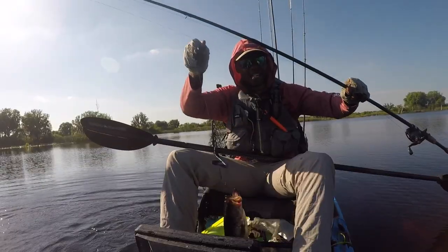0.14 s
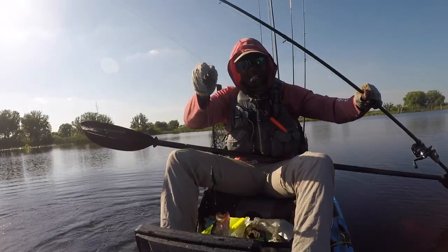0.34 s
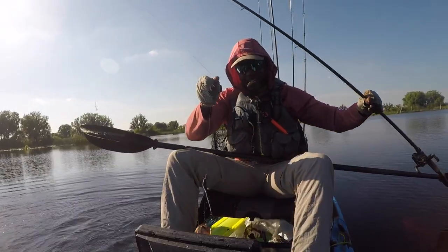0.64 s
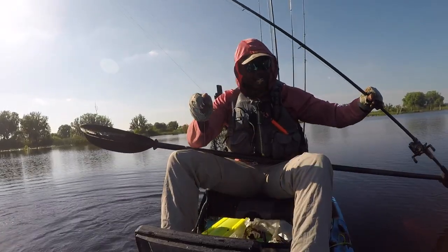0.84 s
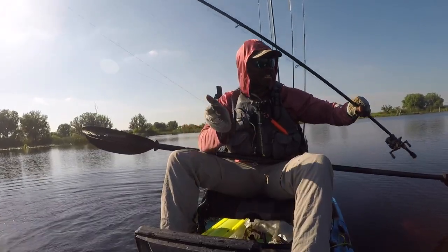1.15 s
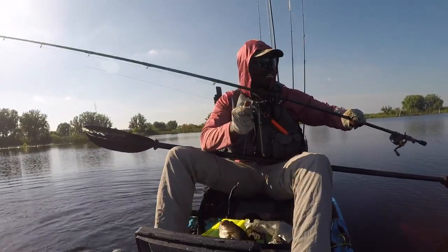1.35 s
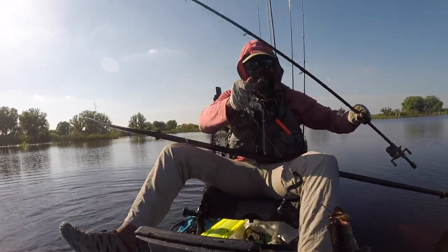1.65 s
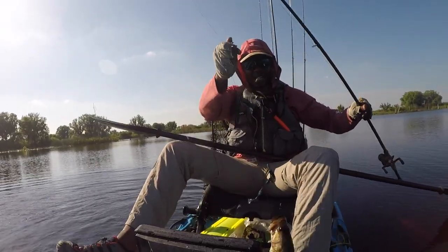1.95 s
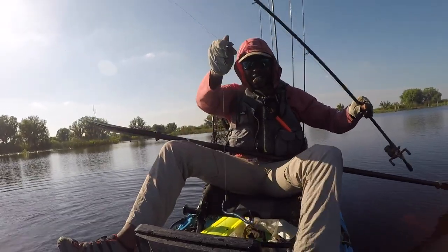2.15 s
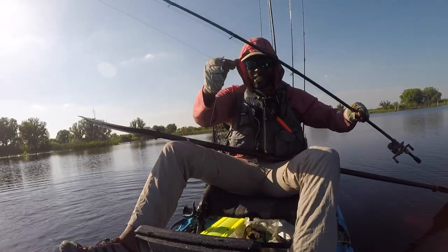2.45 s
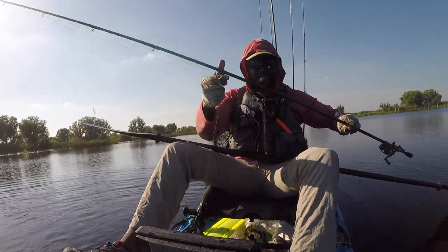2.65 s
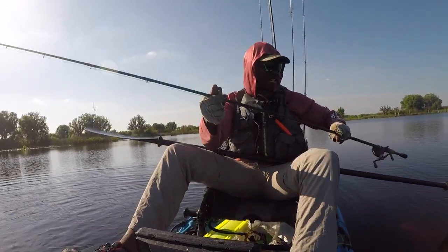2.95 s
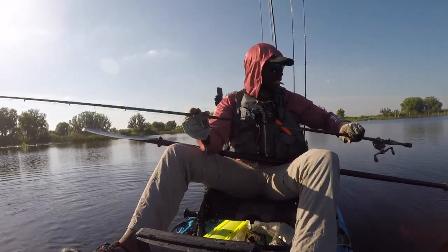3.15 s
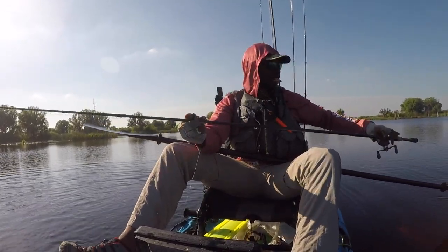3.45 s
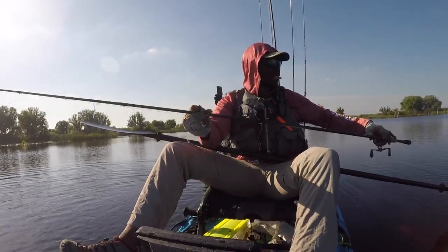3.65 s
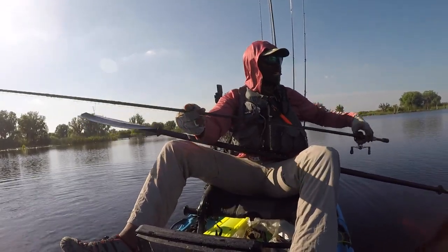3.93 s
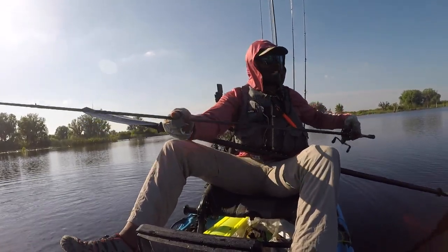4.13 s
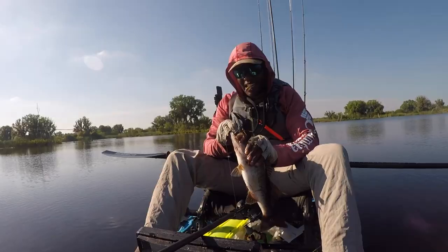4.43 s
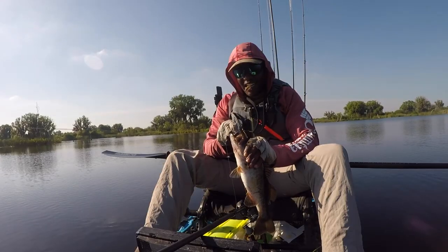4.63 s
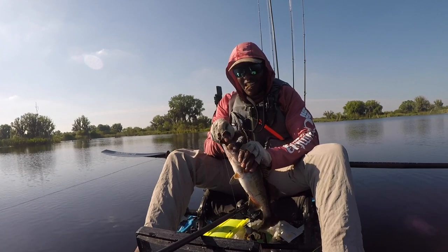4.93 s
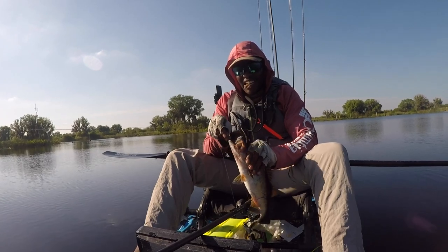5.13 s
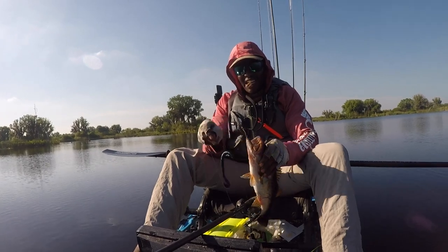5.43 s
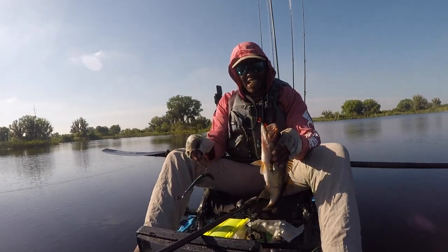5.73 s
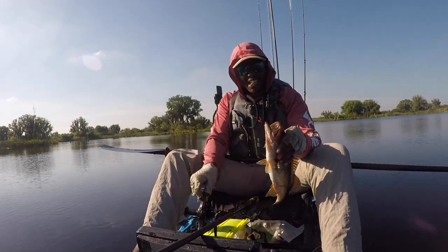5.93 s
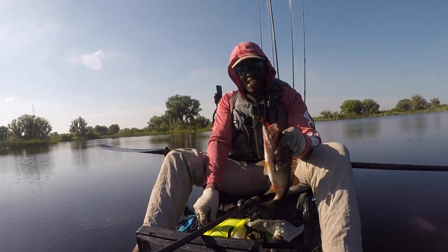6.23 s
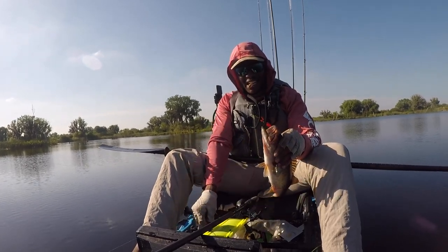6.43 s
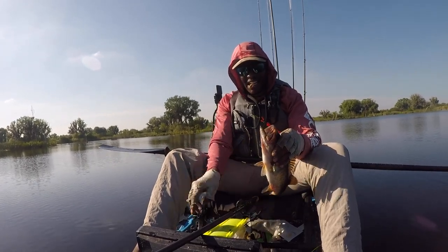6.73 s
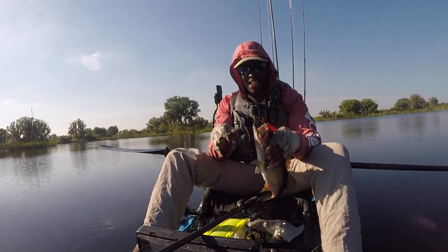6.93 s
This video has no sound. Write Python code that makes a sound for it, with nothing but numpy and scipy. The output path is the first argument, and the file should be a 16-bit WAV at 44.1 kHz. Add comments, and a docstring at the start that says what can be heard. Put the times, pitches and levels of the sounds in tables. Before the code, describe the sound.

Heavy wet flops boom through a plastic boat hull with cracking tail smacks and spray, before a sudden cut to soft waves and small clicks.

```python
"""Calm lake, plastic kayak: a large fish thrashes in the footwell. Its body drums resonant hull noise and sagging
tones; its wet tail cracks and sprays in bursts of noise, with short ringing pops of trapped air.
A marsh bird buzzes a short trill of pulsed tones. A cut at 4.4 s ends the thrashing; the next scene has tackle
clicks (noise, pings, lid tones) over small waves. Drips are gliding tones; lapping and hiss are shaped noise.
Two ports on the boat hear it all."""
import sys
import numpy as np
from scipy import signal
from scipy.fft import rfft, irfft, next_fast_len
from scipy.io import wavfile
from scipy.ndimage import uniform_filter1d, map_coordinates

SR = 44100
rng = np.random.default_rng(int(sys.argv[2]) if len(sys.argv) > 2 else 0)


def elevation(decibels):
    """Turn decibel levels (scalar or array-like) into linear amplitude ratios."""
    levels = np.asarray(decibels, float)
    return 10 ** (levels / 20)


def store_pcm(level_fs):
    """Save levels as 16-bit WAV."""
    pcm = np.round(np.clip(level_fs, -1, 1) * 32767).astype(np.int16)
    wavfile.write(sys.argv[1], SR, np.atleast_2d(pcm).T)


N = 312228
CUT_S = 4.395  # cut: the scene jumps from the thrashing to small waves and tackle

# hull wall resonances: (centre [Hz], width of one pass [Hz], gain [dB])
HULL_MODES = [(166, 47.7, -4), (210.7, 59, 0), (261.8, 70.3, -1.5), (340, 51.6, -4), (388.2, 49, -7)]
# footwell cavity and deck resonances: (centre [Hz], width of one pass [Hz], gain [dB])
WELL_MODES = [(449.3, 56, 3), (600, 112, 8), (800, 154, 5), (1206, 530, -14)]
# colour of a wet smack: (frequency [Hz], relative gain [dB])
SMACK_COLOUR = [(900, 17), (1500, 8.5), (2700, 4), (4000, 1), (6000, -14.5)]
# colour of spray: (frequency [Hz], relative gain [dB])
SPRAY_COLOUR = [(3000, -4.5), (4800, -3.5), (6400, 2.5), (8000, -7), (9200, -14), (10500, -17),
                (12000, -64), (15000, -62.5)]
# rocking of the boat and place of the fish: (time [s], level [dB], left-right shift before clipping [dB])
BOAT_ROCKING = [(0.0, -58, -11), (0.02, -52.5, 0), (1.09, -67, -1), (1.38, -42, -1.5), (1.48, -43.5, 2.5),
                (1.53, -21.5, -3.5), (1.62, -28, -1), (1.68, -41, 2), (1.79, -21, -2), (1.91, -34, -1.5),
                (2.07, -20.5, -4), (2.13, -44.5, 1), (2.21, -34.5, -1), (2.41, -47, 0.5), (2.57, -33, 0.5),
                (2.84, -37, 1), (2.94, -30.5, -2), (3.06, -25, 1), (3.15, -22, 0.5), (3.46, -27.5, -1),
                (3.52, -22, 0.5), (3.59, -27.5, 3), (3.68, -20, 0), (3.9, -38.5, 2.5), (4.25, -28.5, 5),
                (4.3, -39.5, 7.5), (4.35, -25.5, 3.5), (4.4, -31.5, 7.5)]
# stereo width of the treble: (time [s], side gain [dB])
TREBLE_WIDTH = [(0, 2.5), (2.3, 3.5), (3.6, -3), (3.9, -24.5), (4.38, -37), (4.4, 3), (7.08, 2.5)]


def unit(x):
    """Scale to rms 1."""
    return x / np.sqrt(np.mean(x ** 2) + 1e-20)


def along(points, hz):
    """Interpolate (frequency [Hz], value) points on a log frequency axis."""
    f, v = np.transpose(points)
    return np.interp(np.log(hz + 1), np.log(f + 1), v)


def curves(rows):
    """One value per sample for each column after the time; -120 outside the rows."""
    s, *cols = np.transpose(rows)
    return [np.interp(np.arange(N) / SR, s, c, -120, -120) for c in cols]


def held(times, values, ahead_s=.02):
    """The value of the latest event, taken slightly early, and the seconds from it."""
    t = np.arange(N) / SR + ahead_s
    latest = np.clip(np.searchsorted(times, t) - 1, 0, None)
    return values[latest], np.abs(t - times[latest])


def filtered(x, response):
    """Filter x by a complex response of frequency."""
    m = next_fast_len(N + 8192)
    return irfft(rfft(x, m) * response(np.fft.rfftfreq(m, 1 / SR)), m)[..., :N]


def coloured(x, points):
    """Filter x by a (frequency [Hz], gain [dB]) colour, rms 1."""
    return unit(filtered(x, lambda hz: elevation(along(points, hz))))


def ringing(x, modes):
    """Causal resonances of alternating sign, applied twice for dark valleys, rms 1."""
    def one_pass(f):
        total = 0
        for k, (centre, width_hz, db) in enumerate(modes):
            mode = 1j * f * width_hz / (centre * centre - f * f + 1j * f * width_hz)
            total = total + (-1) ** k * elevation(db / 2) * mode
        return total
    return unit(filtered(x, lambda f: one_pass(f) ** 2))


def lumpy(knots_per_s, depth_db):
    """Two noises sharing a randomly wandering level."""
    knots = rng.standard_normal(int(N * knots_per_s / SR) + 4)
    wander = map_coordinates(knots, [np.arange(N) * knots_per_s / SR])
    return elevation(depth_db * wander) * rng.standard_normal((2, N))


def wavering(hz, width_hz):
    """Two narrow noises riding on a moving pitch, rms 1."""
    slow = filtered(rng.standard_normal((2, 2, N)), lambda f: 1 / (1 + (f / width_hz) ** 2))
    phase = 2 * np.pi * np.cumsum(np.clip(hz, 0, SR / 2)) / SR
    return unit(slow[0] * np.cos(phase) + slow[1] * np.sin(phase))


def decays(times, db, t60_s, rise_s):
    """Envelope: every event rises with time constant rise_s and dies exponentially."""
    env, t = np.zeros(N + SR), np.arange(SR // 3) / SR
    for s, level_db, life_s in zip(times, db, t60_s):
        env[round(s * SR):][:len(t)] += elevation(level_db - 60 * t / life_s) * (1 - np.exp(-t / rise_s))
    return env[:N]


def swells(times, db, rise_s, t60_s):
    """Envelope: every event climbs 60 dB in rise_s and loses them in t60_s; powers add."""
    power = np.zeros(N)
    for s, level_db, up, down in np.broadcast(times, db, np.clip(rise_s, .005, 5), np.clip(t60_s, .01, 5)):
        i, j = max(round((s - up) * SR), 0), min(round((s + down) * SR), N)
        t = np.arange(i, j) / SR - s
        power[i:j] += elevation(2 * (level_db - 60 * np.maximum(t / down, -t / up)))
    return np.sqrt(power)


def wavelets(times, db, hz, swell_s, sags=1):
    """Short tones that swell and die on a sagging pitch; the second wave starts at a chance phase."""
    out, t = np.zeros((2, N + SR)), np.arange(SR // 4) / SR
    start = rng.uniform(0, 2 * np.pi, (len(times), 2, 1)) * [[0], [1]]
    sag_t = t + sags * 0.18 * 0.018 * (1 - np.exp(-t / 0.022))
    for s, level_db, f, rise_s, phase in zip(times, db, hz, np.clip(swell_s, .001, .03), start):
        env = t / rise_s * np.exp(1 - t / rise_s)
        out[:, round(s * SR):][:, :len(t)] += elevation(level_db) * env * np.sin(2 * np.pi * f * sag_t + phase)
    return out[:, :N]


def ports(pair, more_db=0, loose=1):
    """A common wave reaches the two ports with a lead and a tilt; the second wave is the unrelated share."""
    # phase lead between ports, before side weights: (frequency [Hz], left lead [rad])
    lead_rows = [(0, 0.1), (240, -1.5), (520, -3), (1120, -3.6), (1640, -5.2), (4570, -6.4), (7240, -7.4),
                 (9820, -6.8), (15000, -6.4)]
    # level tilt between ports, before side weights: (frequency [Hz], left-right [dB])
    tilt_rows = [(60, -3.5), (120, -10), (240, -10.5), (470, -10), (940, -1.5), (1880, -4.5), (3740, -3),
                 (7450, -5.5), (14800, -4)]
    # unrelated sound at the ports, before the loose factor: (frequency [Hz], share [0-1])
    loose_rows = [(30, 0.28), (120, 0.32), (250, 0.53), (600, 0.088), (1200, 0.36), (3000, 0.31),
                  (8000, 0.65), (14000, 0.76)]

    def side(sign):
        def response(hz):
            share = np.clip(loose * along(loose_rows, hz), 0, 1)
            gain = elevation(sign * (along(tilt_rows, hz) + more_db) / 2)
            turn = np.exp(.5j * sign * np.interp(hz, *np.transpose(lead_rows)))
            return gain * turn * [np.sqrt(1 - share / 2), sign * np.sqrt(share / 2)]
        return filtered(pair, response).sum(0)
    return np.array([side(0.86), side(-1.085)])


def spread(pair, side_db):
    """Widen or narrow a stereo pair by the gain of its side signal."""
    mid, side = (pair[0] + pair[1]) / 2, (pair[0] - pair[1]) / 2 * elevation(side_db)
    return np.array([mid + side, mid - side])


def low_cut(x, hz):
    """Steep high-pass: the wind filter of the microphone."""
    return filtered(x, lambda f: 1 / np.sqrt(1 + (hz / (f + 1)) ** 40))


def thrashing():
    """Each flop drums the hull, sounds its lowest note, which sags, and sloshes water; the boat rocks; drops fly."""
    # body flops on the hull: (time [s], relative drumming level [dB], relative note level [dB],
    # starting note [Hz], drumming t60 [s])
    flop_rows = [(.02, -30.5, -37, 194, 0.63), (.34, -31.5, -40, 184.7, 0.42),
                 (.71, -38.5, -56.5, 207, 0.71), (1.01, -58, -46, 175.1, 1.12),
                 (1.12, -30.5, -44, 189, 1.5), (1.18, -25, -40.5, 201.6, 1.2),
                 (1.235, -22.5, -38.5, 207, 0.47), (1.275, -11, -28, 206, 0.34),
                 (1.31, -8, -13, 185.1, 0.3), (1.495, -19, -27, 152.2, 0.55),
                 (1.53, -16, -19.5, 160.3, 0.42), (1.63, -13.5, -17, 182.8, 0.12),
                 (1.66, -22, -26, 190.1, .4), (1.71, -22.5, -34, 155.8, .8), (1.78, -19.5, -28.5, 158.7, 1),
                 (1.83, -20, -20, 174.9, 0.23), (1.915, -24, -37.5, 165.6, 0.94),
                 (1.98, -21.5, -21, 140.1, 0.54), (2.04, -16.5, -17.5, 189.1, 0.1),
                 (2.17, -25, -22, 129.9, 0.14), (2.245, -31.5, -37, 123.3, 0.33),
                 (2.413, -23.5, -37, 201.8, 0.22), (2.55, -17.5, -28, 141.5, 0.27),
                 (2.6, -41.5, -20.5, 130.1, 0.45), (2.845, -33.5, -29.5, 169, 0.75),
                 (2.87, -26, -27, 167, 0.68), (2.941, -13, -20, 160.6, 0.46), (3.02, -18, -21, 173.6, 0.18),
                 (3.11, -14.5, -14, 132, 0.34), (3.18, -28.5, -18.5, 109.4, 0.27),
                 (3.372, -13, -14.5, 145, 0.6), (3.421, -13, -17, 158.9, 0.59),
                 (3.48, -14, -21, 149.6, 0.28), (3.54, -14.5, -32, 128, 0.18), (3.596, -42, -21, 123.2, .3),
                 (3.67, -16.5, -35.5, 111.7, 0.2), (3.71, -40, -17.5, 109.1, 0.16),
                 (3.845, -35, -43, 110, 1.2), (3.927, -28.5, -34.5, 123, 0.32),
                 (4.081, -16, -30.5, 188.3, 0.25), (4.11, -30, -19, 144.8, 0.26),
                 (4.176, -26, -28.5, 113.1, 0.25), (4.328, -26.5, -27.5, 108.5, 0.42),
                 (4.35, -21.5, -22.5, 109.9, 0.19)]
    # water flung off the fish: (time [s], relative fizz level [dB], relative spatter level [dB],
    # 60 dB rise before clipping [s], t60 [s])
    splash_rows = [(1.059, -58, -36.5, 0, 0.17), (1.215, -47, -52.5, 0.4, .08),
                   (1.263, -28, -35.5, 0.05, 0.05), (1.282, -28.5, -29.5, 0.1, 0.042),
                   (1.33, -53.5, -34.5, 0.8, 0.17), (1.44, -51, -58, 0.3, 0.2),
                   (1.5, -45, -46.5, 0.4, 0.15), (1.53, -46.5, -40, 0.2, 0.15),
                   (1.634, -44.5, -38, 0.2, .03), (1.77, -49, -53, 0.3, .1),
                   (1.805, -40, -53.5, 0.12, 0.12), (1.838, -44, -52, .1, .06),
                   (1.9, -48.5, -53.5, -2.5, 0.18), (1.95, -46, -48, -0.5, 0.14),
                   (1.99, -42, -50, 0.5, 0.21), (2.03, -52.5, -55, 4, 0.028),
                   (2.178, -38, -39.5, 0.06, 0.033), (2.25, -51, -44, 0.17, 0.092),
                   (2.94, -53.5, -50, 0, .15), (3.01, -37.5, -42, 0.1, .12), (3.121, -22, -27, 0.07, 0.02),
                   (3.14, -57, -62, .005, 1), (3.364, -16, -27, -0.02, 0.022),
                   (3.425, -30.5, -41.5, -0.4, 0.033), (3.47, -43.5, -45, 2, 0.03),
                   (3.54, -56, -47, .005, .18), (3.67, -41.5, -46.5, 0.1, 0.12),
                   (3.94, -57, -44.5, -0.5, .25), (4.08, -53, -36, .03, 0.17), (4.11, -62, -46, .1, .5),
                   (4.19, -62, -47, .05, .25), (4.339, -42, -36, .005, 0.046), (4.38, -57, -24, 0, 0.044)]
    # colour of the rocking: (frequency [Hz], relative gain [dB])
    rock_colour = [(12, -20.5), (30, 19), (40, 26), (55, 16), (85, 21), (120, -57.5)]
    rise_s, note_sag_share, sag_s = 0.05, .15, .08
    s, drum_db, note_db, hz, t60_s = np.transpose(flop_rows)
    start_hz, since_s = held(s, hz)
    note_hz = uniform_filter1d(start_hz * (1 - note_sag_share * (1 - np.exp(-since_s / sag_s))), size=400)
    rock = elevation(curves(BOAT_ROCKING)[0]) * coloured(lumpy(6.4, 1.5), rock_colour)
    # the note outlives the drumming; the slosh dies sooner
    note = swells(s, note_db - 2.5, rise_s, 1.55 * t60_s) * wavering(note_hz, width_hz=32.8)
    drum = swells(s, drum_db - 6, rise_s, t60_s) * ringing(lumpy(30, 2), HULL_MODES)
    slosh = swells(s, drum_db - 14, rise_s, 0.89 * t60_s) * ringing(lumpy(60, 3.5), WELL_MODES)
    s, fizz_db, spatter_db, splash_rise_s, t60_s = np.transpose(splash_rows)
    fizz = swells(s, fizz_db - 4.0, splash_rise_s, t60_s) * coloured(lumpy(300, 3.2), SPRAY_COLOUR)
    spatter = swells(s, spatter_db - 8.0, splash_rise_s, t60_s) * coloured(lumpy(350, 3.2), SMACK_COLOUR)
    return rock + note + drum + slosh + fizz + spatter


def blows():
    """Blows dent the wall, which booms; slaps rattle the footwell and knock its cavity."""
    # slaps in the footwell: (time [s], relative level [dB], settled cavity pitch [Hz])
    slap_rows = [(.158, -39, 600), (.343, -35.5, 610), (1.114, -41.5, 593), (1.178, -27, 625),
                 (1.267, -13.5, 465), (1.293, -12, 412), (1.331, -11.5, 577), (1.358, -18.5, 453),
                 (1.493, -19, 710), (1.526, -31, 580), (1.604, -28, 607), (1.629, -22, 800),
                 (1.641, -26, 760), (1.701, -23, 468), (1.736, -34.5, 570), (1.771, -26, 485),
                 (1.797, -23, 800), (1.818, -21.5, 481), (1.838, -15.5, 556), (1.8386, -24, 846),
                 (1.855, -28.5, 620), (1.932, -29, 587), (1.962, -27, 503), (1.995, -25, 455),
                 (2.035, -22.5, 488), (2.157, -29.5, 616.8), (2.19, -28.5, 553), (2.407, -22, 750),
                 (2.41, -20, 480), (2.541, -28, 496), (2.853, -38.5, 510), (2.881, -31, 574),
                 (2.936, -16.5, 514), (2.972, -24, 645), (3.01, -23, 502), (3.108, -9.5, 598),
                 (3.197, -27, 600), (3.366, -5.5, 634), (3.404, -16, 522), (3.474, -12, 655),
                 (3.535, -16.5, 570), (3.652, -30.5, 715), (3.668, -14.5, 574), (3.845, -46, 487.1),
                 (3.927, -18, 556), (4.074, -11.5, 796), (4.095, -25.5, 560), (4.168, -25, 490),
                 (4.186, -26, 620), (4.324, -21.5, 476), (4.345, -16.5, 830)]
    # booms of the hull wall: (time [s], relative level [dB], settled pitch [Hz])
    boom_rows = [(0.028, -24.5, 255), (0.121, -35, 193), (.156, -29.5, 340), (0.304, -37, 171),
                 (0.344, -29, 154), (.461, -48.5, 171), (.545, -42.5, 178), (0.708, -36, 241),
                 (0.738, -24.5, 200), (0.861, -35, 220), (1.025, -35, 187), (1.117, -30.5, 186),
                 (1.176, -25, 247), (1.286, -11, 316), (1.291, -14, 279), (1.314, -11.5, 185),
                 (1.444, -31, 126.6), (1.492, -15, 345), (1.525, -8, 168), (1.56, -16.5, 170),
                 (1.626, -6.5, 187), (1.706, -14, 171), (1.776, -12, 243), (1.802, -14, 191),
                 (1.82, -13, 169.5), (1.838, -9.5, 209), (1.913, -23, 223), (1.979, -21, 131.5),
                 (2.034, -6.5, 192), (2.101, -25, 113), (2.168, -20.5, 126.7), (2.196, -17, 91),
                 (2.228, -23.5, 94.4), (2.251, -20.5, 133), (2.407, -27.5, 365), (2.54, -21.5, 386),
                 (2.544, -6, 128), (2.545, -9.5, 223.5), (2.566, -4.5, 120), (2.586, -13.5, 116.5),
                 (2.603, -10, 116), (2.62, -12.5, 117), (2.636, -10.5, 112.6), (2.862, -18, 198.6),
                 (2.937, -9.5, 158), (3.014, -14.5, 196), (3.024, -9, 225), (3.102, -10, 108.3),
                 (3.372, -10.5, 190), (3.413, -15, 175.5), (3.442, -8, 149.4), (3.471, -7.5, 193),
                 (3.5, -12, 140), (3.555, -12, 112), (3.578, -12.5, 109.4), (3.645, -14.5, 111),
                 (3.79, -35.5, 173), (4.001, -34.5, 109), (4.076, -15.5, 361), (4.074, -14, 206),
                 (4.084, -10.5, 217), (4.1, -12.5, 213), (4.35, -20.5, 248)]
    slap_t60_s, knock_swell_s, boom_swell_s = 0.058, 0.0027, 0.0052
    s, db, hz = np.transpose(slap_rows)
    rattle = ringing(rng.standard_normal((2, N)), WELL_MODES)
    slap = decays(s, db - 1.5, slap_t60_s + 0 * s, rise_s=0.0016) * rattle
    knock = wavelets(s, db - 4.5, hz, knock_swell_s + 0 * s)
    s, db, hz = np.transpose(boom_rows)
    boom = wavelets(s, db - 3.0, hz, boom_swell_s + 0 * s)
    return slap + knock + boom


def smacks():
    """Wet skin cracks on plastic and throws spray; each smack has its own place."""
    # wet tail smacks: (time [s], relative smack level [dB], spray against smack before trim [dB],
    # t60 [s], left-right shift before port tilt [dB])
    smack_rows = [(1.0462, -40, 8, 0.034, -6), (1.2195, -41, 11, 0.031, 1), (1.2314, -30.5, 8, 0.028, -1),
                  (1.2693, -18.5, 3, 0.043, 2.5), (1.2735, -16.5, 8.5, 0.015, -1),
                  (1.2777, -14, 6.5, 0.02, -7.5), (1.283, -23, -6, 0.062, -1.5),
                  (1.2952, -23.5, 4, 0.025, -3), (1.315, -30, -27, 0.02, -7),
                  (1.328, -24.5, -14, .03, -2.5), (1.3596, -34.5, -7, 0.03, -13),
                  (1.4645, -52, 10, .025, -9), (1.4915, -43, 3, .03, -11), (1.518, -46, -2, .015, -9),
                  (1.538, -48, 8, .025, -9), (1.6055, -45, 2, .03, -8), (1.628, -13.5, 4, 0.011, -8),
                  (1.6574, -38.5, -5, 0.02, -7), (1.695, -49.5, 11.5, 0.065, -12),
                  (1.703, -44.5, 0, .02, -14.5), (1.733, -42, -4, 0.043, -13),
                  (1.7567, -42.5, -10, 0.04, -14.5), (1.765, -44, 4, .012, -15),
                  (1.796, -54, 10, 0.035, -15), (1.832, -47, 9, 0.03, -12), (1.84, -39, 1, 0.018, -18.5),
                  (1.9425, -41, -13, 0.096, -19), (1.976, -46.5, 3, 0.057, -18), (2.001, -42, 0, .012, -15),
                  (2.0095, -50, 18, .012, -15), (2.103, -49.5, 11, 0.025, -7),
                  (2.036, -51, -26.5, .033, -10), (2.1567, -46, -18, .031, -7),
                  (2.4075, -40.5, -5, 0.02, -1), (2.1723, -28.5, -10, 0.058, -2.5),
                  (2.541, -44.5, 2, 0.029, -3.5), (2.85, -45, 1, 0.043, 2), (2.935, -26, -4, 0.056, -3),
                  (2.993, -46.5, -2, .027, 2), (3.008, -28.5, 3.5, 0.067, -3), (3.0507, -39, -7, 0.093, 1),
                  (3.099, -39, 2, 0.054, 5.5), (3.1176, -17.5, 0, 0.027, -8.5), (3.198, -46.5, 4, 0.08, -2),
                  (3.339, -41, 3, 0.052, 1), (3.3555, -29, -2, 0.048, -4), (3.3625, -22.5, -3, 0.03, 0),
                  (3.37, -28, 1.5, 0.033, -1), (3.4252, -29, 3, 0.018, -2), (3.454, -30.5, -6, 0.074, -1),
                  (3.467, -35, 2, 0.033, 0), (3.481, -34, 1.5, .03, -4), (3.5358, -30.5, 0, 0.036, -2),
                  (3.6498, -45, 5, 0.051, -9), (3.664, -28.5, 8.5, 0.011, 14),
                  (3.927, -18, -16, 0.022, 6.5), (3.9397, -25.5, -11, 0.089, -4),
                  (3.998, -42, -2, 0.016, -4), (4.047, -37, -7, 0.015, 0), (4.073, -15, -6.5, 0.035, 5.5),
                  (4.1657, -26, -16.5, 0.043, -4), (4.185, -37, -22, 0.063, -6),
                  (4.3276, -36, -14, 0.071, 13), (4.337, -27, 0, 0.05, 5), (4.3462, -21.5, -2, 0.055, 9.5),
                  (4.36, -39, -8, 0.028, 1), (4.3733, -27, 3, 0.032, -4.5)]
    s, db, spray_db, t60_s, pan_db = np.transpose(smack_rows)
    t60_s = np.clip(t60_s, .008, .2)

    def both(level_db):
        return np.array([decays(s, level_db + sign * pan_db / 2, t60_s, rise_s=0.00084) for sign in (1, -1)])

    ragged, speckled = lumpy(600, 2), lumpy(700, 2.8)
    crack = both(db - 2.5) * ports(coloured(ragged, SMACK_COLOUR), more_db=-1.5)
    spray = both(db + spray_db - 3.0) * ports(coloured(speckled, SPRAY_COLOUR), more_db=5.0)
    return filtered(spread(crack + spray, *curves(TREBLE_WIDTH)), lambda f: 1 / (1 + 1j * f / 9000) ** 2)


def pops():
    """Trapped air rings raggedly for a few cycles."""
    # wet pops: (time [s], relative level [dB], pitch [Hz], swell before clipping [s])
    pop_rows = [(1.219, -43.5, 1950, .002), (1.248, -42, 3250, 0.0012), (1.2674, -27, 1580, 0.0018),
                (1.273, -16.5, 2950, 0.0013), (1.2732, -20.5, 1360, 0.0019), (1.277, -32.5, 4080, 0.001),
                (1.294, -28.5, 1590, 0.002), (1.317, -28, 1500, 0.0035), (1.33, -33.5, 3350, 0.0013),
                (1.334, -33.5, 1500, 0.0021), (1.38, -51, 3280, 0.0012), (1.4912, -41, 1410, 0.0018),
                (1.522, -48.5, 1530, .006), (1.6067, -40, 1260, .002), (1.6289, -29, 2360, 0.0018),
                (1.6573, -48, 2200, 0.0025), (1.695, -42, 5510, .0015), (1.7386, -40, 1310, 0.0022),
                (1.8398, -34, 1535, 0.0019), (2.068, -55, 3320, 0.0013), (2.1577, -37.5, 1410, 0.0036),
                (2.175, -37, 1820, 0.0031), (2.5415, -45, 1600, 0.0018), (2.5528, -35.5, 1155, 0.0027),
                (2.843, -51.5, 2300, 0.0013), (2.8532, -34.5, 1270, 0.0032), (2.8965, -38, 1140, .002),
                (2.911, -41, 1155, 0.002), (3.013, -31, 1475, 0.0038), (3.091, -33.5, 1390, 0.0022),
                (3.12, -30, 2970, 0.00097), (3.156, -48, 1590, 0.0018), (3.2, -50, 1700, 0.0027),
                (3.3645, -15, 6370, 0.0015), (3.481, -37.5, 2780, 0.0024), (3.482, -35, 7400, 0.0014),
                (3.905, -50, 2300, 0.002), (3.942, -28.5, 3240, 0.0018), (4.0748, -15.5, 980, .003),
                (4.1674, -34, 1400, 0.0028), (4.3468, -21.5, 1119, 0.0052), (4.3747, -28.5, 1163, 0.0023),
                (5.484, -45, 905, .004), (5.781, -54, 2840, .003), (6.04, -48, 700, .002),
                (6.3, -48, 1570, .002), (6.316, -44, 1570, 0.003), (6.331, -45, 1760, .002),
                (6.334, -48, 1515, .005), (6.358, -53, 1544, 0.0025), (6.767, -45.5, 1100, .002)]
    s, db, hz, swell_s = np.transpose(pop_rows)
    ragged = .6 + .8 * unit(filtered(rng.standard_normal(N), lambda f: 1 / (1 + (f / 350) ** 2)))
    ring = ragged * wavelets(s, db, hz, swell_s, sags=0)
    return spread(ports(ring, loose=0.51), *curves(TREBLE_WIDTH))


def bird():
    """Rapid chirps, slower at lower pitch, on a top band; two rougher lower bands sound between them."""
    # bird trill: (time [s], pitch [Hz], relative level [dB], phase sweep within a chirp [rad],
    # lower bands against top [dB])
    trill_rows = [(2.86, 5730, -74, .7, -12), (2.895, 5510, -52, .7, -15), (2.93, 5580, -64, .7, -17),
                  (2.97, 5564, -81, 0.71, -11), (3.09, 5706, -79, .7, -12), (3.13, 5710, -51.5, 1.6, -13),
                  (3.22, 5720, -51, 1.6, -10), (3.34, 5883, -48.5, 1.3, -12), (3.5, 5830, -62, 1.5, -9),
                  (3.65, 5710, -58.5, 1.5, -7), (3.68, 5550, -63, 0.99, -7), (3.715, 5130, -63, 3, -18),
                  (3.73, 4920, -55.5, 2.6, -15), (3.82, 4550, -57, 2, -16.5), (3.835, 4430, -68, 2.1, -16),
                  (3.9, 4300, -71, 1.5, -16), (3.95, 4400, -85, 1.5, -22.5)]
    top_chirps_per_s, chirps_per_s_per_khz = 124, 17  # rate at the top note, its fall with pitch
    hz, upper_db, sweep_rad, lower_db = curves(trill_rows)
    rate = top_chirps_per_s - chirps_per_s_per_khz * (hz.max() - hz) / 1000
    beat = 2 * np.pi * np.cumsum(rate) / SR

    def gate(lag):
        pulse = unit(.35 + (.5 + .5 * np.cos(beat - lag)) ** 2)
        return pulse * elevation(unit(uniform_filter1d(rng.standard_normal(N), size=600)))

    # slightly rough pitch that falls within each chirp
    jitter = .075 * np.cumsum(rng.standard_normal(N)) + sweep_rad * np.cos(beat)
    upper = np.sin(2 * np.pi * np.cumsum(hz) / SR + jitter) + .45 * wavering(.97 * hz, width_hz=450)
    lower = wavering(.64 * hz, width_hz=350) + wavering(.76 * hz, width_hz=220)
    song = elevation(upper_db) * (gate(lag=0) * upper + elevation(lower_db) * gate(lag=np.pi) * lower)
    return spread(ports(song, more_db=6.0, loose=0.54), *curves(TREBLE_WIDTH))


def tackle():
    """Each click is a broad crack with its own short ping, and knocks the box lid."""
    # tackle clicks: (time [s], relative level [dB], relative lid level [dB], ping [Hz], left-right [dB])
    click_rows = [(4.8499, -21.5, -1, 3000, -4.5), (4.852, -28, -20, 3550, 0),
                  (4.8753, -38, -13, 3020, -.5), (4.893, -48, 0, 5470, -8.5),
                  (4.8967, -38, -2.5, 6150, -8.5), (4.903, -43.5, 1.5, 6000, -11),
                  (4.916, -44, -7, 2500, -8.5), (5.005, -40.5, -6, 4400, -6), (5.4815, -45, -5, 3756, -4),
                  (5.5473, -23.5, -22, 4300, 0), (5.549, -30.5, -27, 6100, -5),
                  (5.5496, -29, -30, 7460, -5.5), (5.8555, -33.5, -39.5, 6350, 0)]
    # tackle box lid modes: (pitch [Hz], relative level [dB], t60 [s])
    lid_rows = [(1220, 6, 0.035), (1500, -13, 0.039), (570, -10.5, 0.032)]
    out, t = np.zeros((2, N + SR)), np.arange(SR // 8) / SR
    lid = sum(elevation(db - 60 * t / t60_s) * np.sin(2 * np.pi * hz * t) for hz, db, t60_s in lid_rows)
    for s, db, lid_db, hz, pan_db in click_rows:
        ping = 0.27 * elevation(-60 * t / 0.011) * np.sin(2 * np.pi * hz * t)
        crack = 0.22 * elevation(-60 * t / 0.026) * rng.standard_normal((2, len(t)))
        click = elevation(db + 6.0) * (elevation(lid_db - 9.0) * lid + ping + crack)
        out[:, round(s * SR):][:, :len(t)] += click * elevation([[pan_db / 2], [-pan_db / 2]])

    def band(f):
        high_pass = 1j * f / (400 + 1j * f)
        return high_pass / (1 - (f / 7500) ** 2 + 1.2j * f / 7500) ** 2
    return filtered(out[:, :N], band)


def drips():
    """Drips and gurgles: soft-edged, slightly rough tones whose pitch glides."""
    # drips and gurgles: (time [s], start pitch [Hz], end pitch [Hz], relative level [dB], length [s])
    drip_rows = [(1.059, 1595, 1680, -56, 0.044), (2.588, 1223, 1235, -58.5, 0.075),
                 (5.161, 556, 577, -55, 0.049), (5.77, 3550, 3800, -57, .014),
                 (5.78, 4000, 4150, -55, 0.026), (5.79, 800, 820, -56, 0.05), (6.3, 340, 358, -42, 0.063)]
    out = np.zeros(N)
    for s, hz, end_hz, db, length_s in drip_rows:
        t = np.arange(round(length_s * SR)) / SR
        mean_hz = hz + (end_hz - hz) * t / (2 * length_s)  # mean pitch so far
        tone = signal.windows.tukey(len(t), .6) * np.sin(2 * np.pi * mean_hz * t)
        out[round(s * SR):][:len(t)] += elevation(db) * tone
    rough = 1 + .45 * unit(uniform_filter1d(rng.standard_normal(N), size=90))
    return rough * out * elevation([[-1.5], [1.5]])


def lake():
    """Faint lapping, open-air hiss and low rumble; after the cut small waves knock the hull."""
    # low lapping: (time [s], relative level [dB])
    lap_rows = [(0, -48), (1.1, -43.5), (1.3, -41), (2.1, -34.5), (2.5, -60), (2.8, -48), (2.9, -51),
                (4.15, -45.5), (4.38, -47), (4.63, -49.5), (5.15, -48), (7.08, -49.5)]
    # hiss: (time [s], relative treble level [dB], relative highest treble level [dB])
    hiss_rows = [(0, -59, -69.5), (1.12, -58.5, -68), (1.44, -56, -73), (1.535, -57, -71.5),
                 (1.56, -63, -77.5), (1.63, -62, -72), (1.65, -74, -83.5), (1.69, -62, -73.5),
                 (1.99, -48, -63), (2.03, -55, -66), (2.05, -70, -86.5), (2.09, -71, -87.5),
                 (2.23, -69, -79), (2.38, -67.5, -78), (2.78, -65.5, -75), (2.9, -56.5, -77),
                 (3.02, -68, -84), (3.3, -62, -84), (3.43, -54, -82), (3.55, -76, -88), (3.61, -61, -88),
                 (3.73, -63, -84), (3.9, -55.5, -78), (4.0, -61, -77), (4.1, -49.5, -78), (4.24, -59, -75),
                 (4.38, -59, -69), (6.15, -57, -68.5), (7.08, -59.5, -68.5)]
    # lake background colour: (frequency [Hz], relative gain [dB])
    air_colour = [(120, 2.5), (175, 4), (260, -4), (400, -7.5), (600, -1), (850, -6.5), (1300, -13),
                  (2000, -19.5), (4000, -25), (6500, -23), (9800, -29), (12000, -36), (15000, -40)]
    # low rumble colour: (frequency [Hz], relative gain [dB])
    rumble_colour = [(15, -3), (30, 0), (60, -3), (100, -10), (130, -40)]
    # small waves on the hull: (time [s], relative level [dB], relative slosh level [dB], hull note [Hz],
    # wave t60 [s])
    wave_rows = [(4.7, -46, -8, 230, 0.24), (4.869, -50, -4, 200, 0.72), (4.93, -44, -24, 197, 0.37),
                 (5.029, -42.5, -0.5, 196, 0.97), (5.35, -53, 5.5, 215, 0.95),
                 (5.505, -40.5, -5, 230, 0.42), (5.57, -42, -9, 203, 0.12), (5.79, -49, -5, 193, 0.43),
                 (6.001, -39, -10, 221, 0.68), (6.09, -44, -8, 199.8, 0.36), (6.32, -40.5, 3, 324, 0.38),
                 (6.82, -41.5, -7, 230, 0.55), (6.85, -35, -12, 185, 0.12)]
    (lap_db,), (hiss_db, top_db), (wide_db,) = curves(lap_rows), curves(hiss_rows), curves(TREBLE_WIDTH)
    pair = ports(coloured(lumpy(26, 1.52), air_colour), more_db=4.0, loose=1.21)
    low = filtered(pair, lambda hz: 1 / (1 + (hz / 500) ** 2))
    top = filtered(pair, lambda hz: 1 / (1 + (9000 / (hz + 1)) ** 8))
    treble = unit(pair - low - top) * elevation(hiss_db + 4.5) + unit(top) * elevation(top_db + 2.5)
    treble = spread(treble, wide_db)

    s, db, slosh_db, hz, t60_s = np.transpose(wave_rows)
    note_hz = held(s, hz, ahead_s=.05)[0]
    after_cut = np.arange(N) > CUT_S * SR
    ripple_db = -54.5  # steady floor under the waves
    wave = after_cut * np.hypot(elevation(ripple_db), swells(s, db, 0.2, t60_s))
    slosh = after_cut * np.hypot(elevation(ripple_db - 18.0), swells(s, db + slosh_db, 0.21, 0.53 * t60_s))
    hull = ringing(lumpy(25, 2.6), HULL_MODES) + 0.67 * wavering(note_hz, width_hz=25)
    waves = wave * elevation(-4.0) * hull
    wash = slosh * ringing(lumpy(50, 6.4), WELL_MODES)
    trickle = slosh * elevation(-20.5) * ringing(lumpy(97, 2.7), [(1440, 400, 0)])
    rumble = elevation(-76) * coloured(lumpy(5, 4.1), rumble_colour)
    lapping = unit(low) * elevation(lap_db - 1.0)
    return low_cut(lapping + treble + ports(waves + wash + trickle, more_db=6.5), hz=132) + rumble


def scene():
    """Everything the boat carries to the ports, and the air around; the fish shifts from side to side."""
    shift_db = np.clip(curves(BOAT_ROCKING)[1], -12, 12)
    before_cut = np.clip((CUT_S - np.arange(N) / SR) / 0.0071, 0, 1)  # 7.1 ms fade-out
    boat = ports((thrashing() + blows()) * before_cut) * elevation([shift_db / 2, -shift_db / 2])
    return boat + smacks() + pops() + bird() + tackle() + drips() + lake()


def low_pass(x):
    """Removes everything above the highest recorded frequency."""
    return signal.sosfilt(signal.butter(12, 15050, fs=SR, output="sos"), x)


def record(dry):
    """Band limit near 14.5 kHz, then a sharp-kneed ceiling at 0.96."""
    wet = filtered(dry, lambda hz: 1 / (1 + (hz / 14500) ** 24))
    wet = wet / (1 + np.abs(wet / .96) ** 8) ** (1 / 8)
    return low_pass(wet)


dry = scene()
out = record(dry)
store_pcm(out)
```